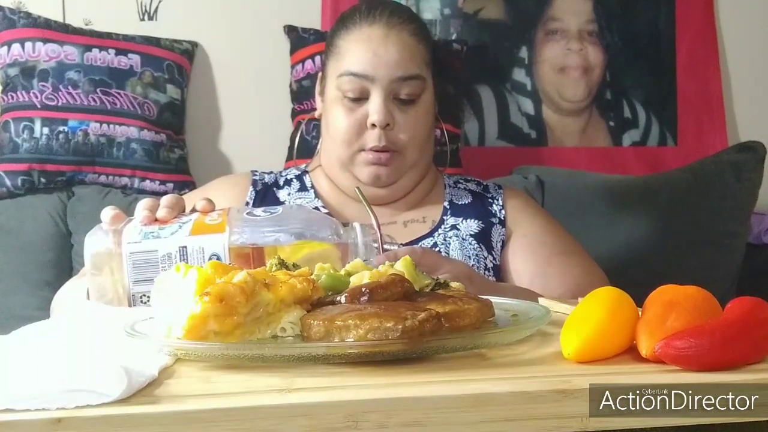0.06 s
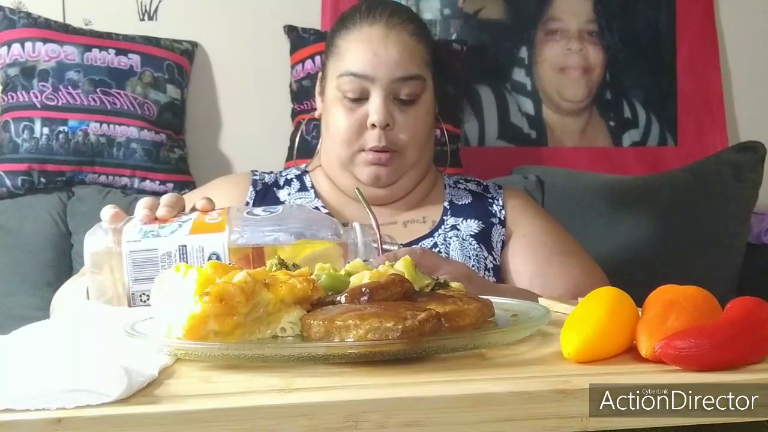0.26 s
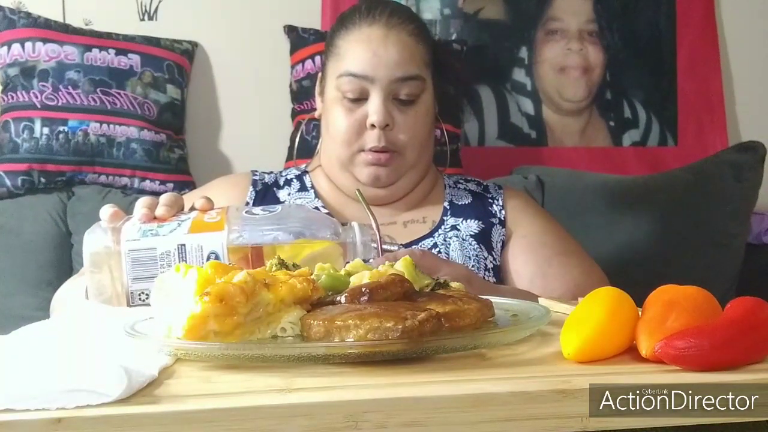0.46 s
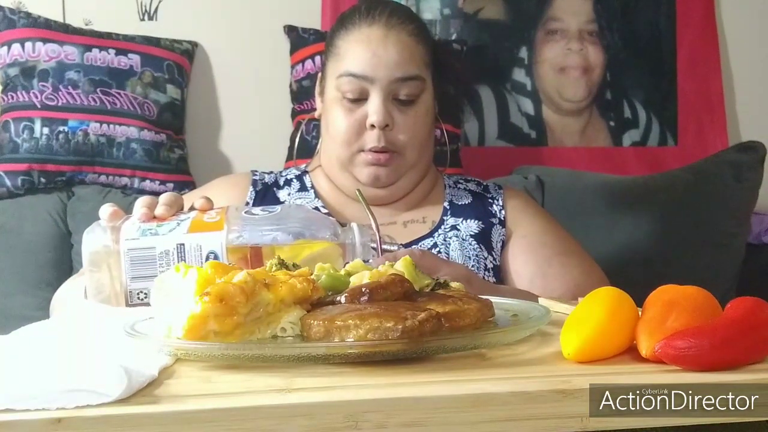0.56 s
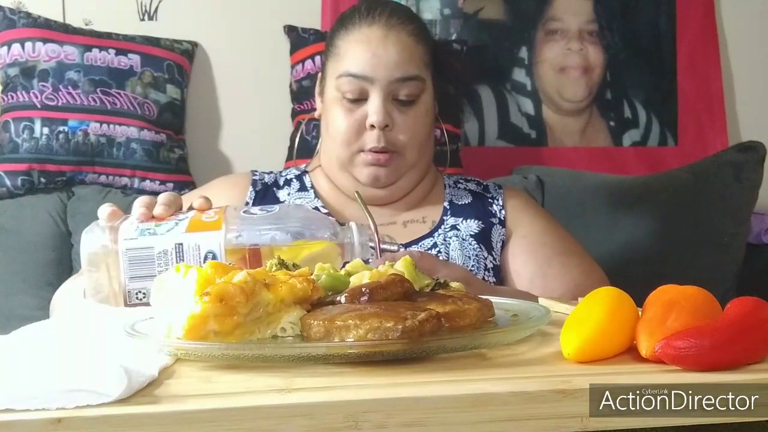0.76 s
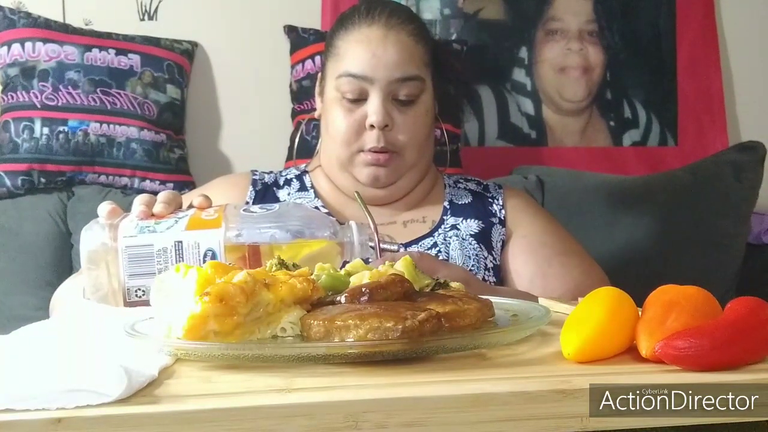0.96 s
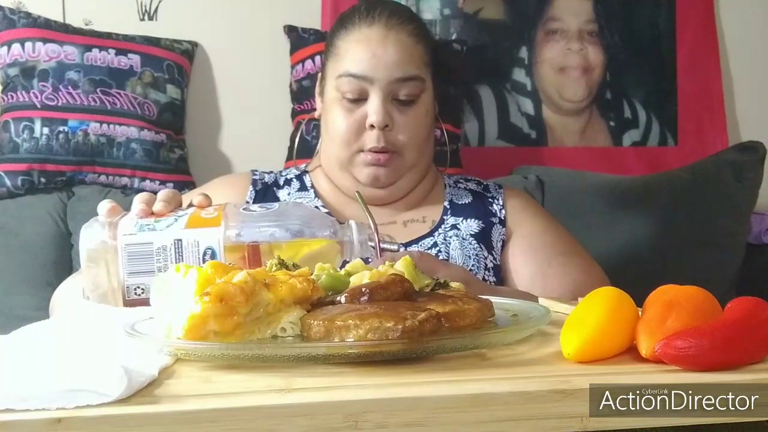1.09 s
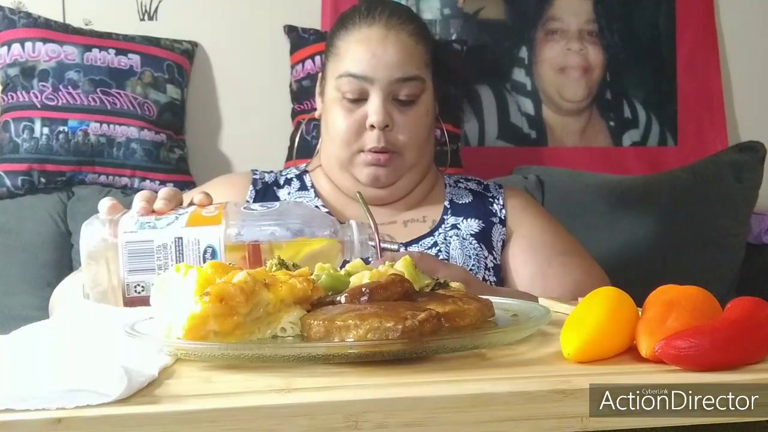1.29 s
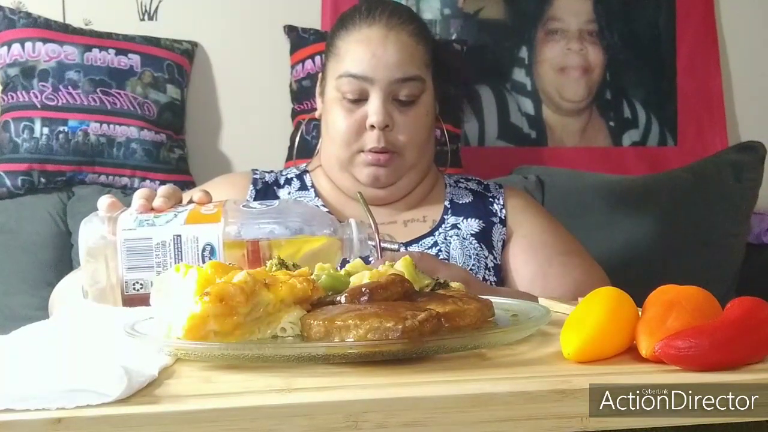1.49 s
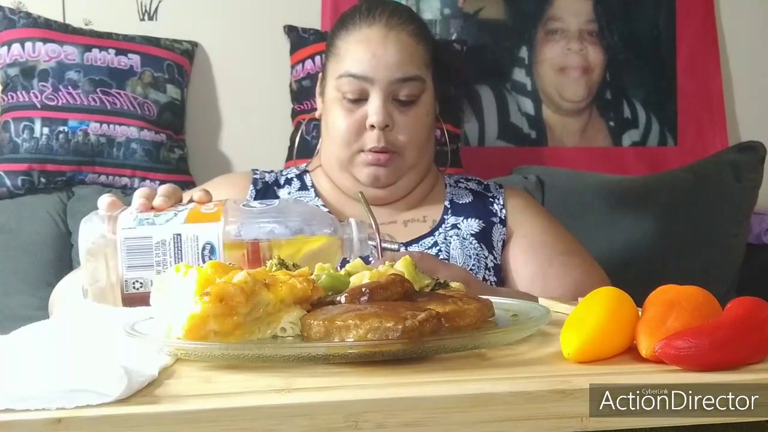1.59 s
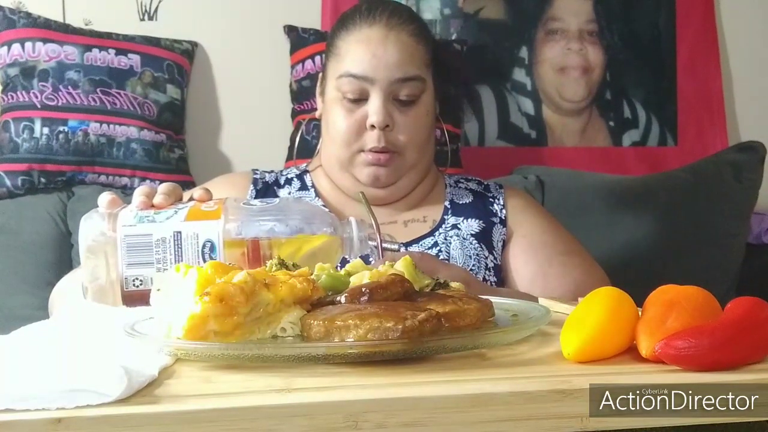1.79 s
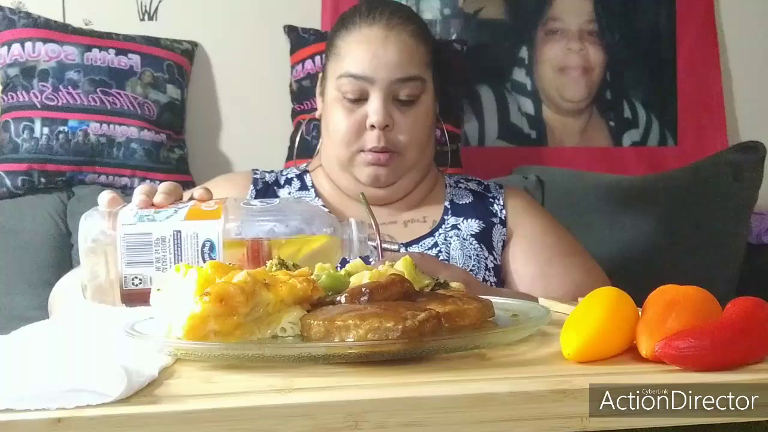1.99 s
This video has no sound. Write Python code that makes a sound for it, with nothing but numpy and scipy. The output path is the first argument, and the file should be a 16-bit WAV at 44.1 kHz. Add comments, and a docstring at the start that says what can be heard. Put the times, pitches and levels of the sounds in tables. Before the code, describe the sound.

A fizzy drink pours from a plastic bottle into a plastic cup, close by in a small, quiet room. Glugs, hollow bottle knocks and splashes come in clusters at about 0.2 and 0.6 seconds, then more strongly around 1.1 and 1.6 seconds with soft low thuds. Foam fizzes lightly throughout with tiny bubble pops and chirps. From 1.7 to 2 seconds, only fizz, pops and light splashing remain.

```python
"""In a small furnished room, a fizzy drink is poured close by from a thin plastic bottle into a plastic cup.
Gulps of air excite the bottle's damped modes, so it knocks, glugs and thuds in irregular clusters.
In the cup the stream splashes and sloshes, small bubbles resonate with a rising chirp or burst,
and the foam fizzes throughout."""
import sys
import numpy as np
from scipy import signal
from scipy.fft import rfft, irfft
from scipy.io import wavfile
from scipy.ndimage import uniform_filter1d

SR = 44100
rng = np.random.default_rng(int(sys.argv[2]) if len(sys.argv) > 2 else 0)


def master_out(mix):
    """Clip the mix to full scale and print it as 16-bit PCM to the path in sys.argv[1]."""
    frames = np.transpose(np.atleast_2d(mix))
    ceiling = np.clip(frames, -1, 1)
    pcm = np.round(ceiling * 32767).astype(np.int16)
    wavfile.write(sys.argv[1], SR, pcm)


N = 90404

# Levels in the tables are relative: each source adds its own gain.
# spectra of the room's background and its reverberation (frequency [Hz], level [dB])
ROOM_TONE_SPECTRUM = [(25, -9), (80, 2), (170, -1), (420, -4.5), (600, -17.5), (4000, -27.5), (15000, -59)]
REVERB_SPECTRUM = [(200, 16.5), (2500, -0.5), (6000, 10), (15000, 0.5)]
# tone of the fizz, ticks and splash, with an equaliser-like treble lift above 5 kHz
# (frequency [Hz], level [dB])
FIZZ_TONE = [(2000, -79), (4700, -7), (5300, 2.5), (6500, 1), (8000, -4), (10500, -5), (13000, -15),
             (15500, -14)]
TICK_TONE = [(1000, -16.5), (4500, -12), (5400, 4.5), (7000, 2), (10000, -4.5), (15500, -13.5)]
SPLASH_TONE = [(900, -10.5), (2000, 2), (3500, -3.5), (4800, -7), (7000, 12)]
# tone of the slosh (frequency [Hz], level [dB])
SLOSH_TONE = [(120, -15.5), (380, -4.5), (900, 0), (2000, -13.5)]
# envelopes of the fizz, whose top treble briefly cuts out
# (time [s], level below 8 kHz [dB], level above 8 kHz [dB])
FIZZ_LEVELS = [(0, -55, -63.5), (.16, -62, -57.5), (.26, -58.5, -52.5), (.4, -54.5, -55), (.62, -59.5, -58),
               (.87, -53, -54), (1.15, -61, -52.5), (1.22, -66, -67), (1.4, -57.5, -58), (1.6, -60.5, -59),
               (1.73, -63.5, -90), (1.781, -52.5, -51.5), (2.05, -62, -63)]
# surges of the stream (time [s], splash level [dB], slosh level [dB])
STREAM_LEVELS = [(0.089, -80, -73), (0.102, -55, -60.5), (0.148, -55.5, -60), (0.166, -71, -78),
                 (0.238, -48, -41.5), (.3, -56.5, -60), (.39, -50.5, -59), (0.483, -59.5, -57),
                 (.53, -73, -71.5), (.58, -72.5, -70.5), (0.653, -53.5, -55), (.7, -70, -71),
                 (0.831, -77.5, -69), (0.881, -57.5, -67.5), (0.95, -76, -69), (0.984, -60, -57),
                 (1.071, -48.5, -47.5), (1.161, -52.5, -49), (1.21, -78.5, -71.5), (1.27, -79, -68),
                 (1.351, -58.5, -53.5), (1.376, -68, -71), (1.533, -70, -67), (1.579, -53.5, -51),
                 (1.698, -70.5, -68), (1.8, -58, -73.5), (1.93, -65.5, -65.5)]
# bubbles bursting at the surface (time [s], level [dB])
POPS = [(0.2583, -33.5), (0.308, -29.5), (0.3711, -35), (0.5473, -31), (0.628, -32), (0.9566, -26.5),
        (1.026, -28.5), (1.049, -31), (1.0769, -22), (1.5575, -32.5), (1.7498, -34), (1.7896, -28),
        (1.7985, -51), (1.821, -34.5), (1.9093, -38), (1.919, -29.5), (1.962, -31.5), (2.022, -30)]
# single bubbles ringing in the cup (time [s], frequency [Hz], level [dB])
PINGS = [(0.017, 9200, -32), (0.049, 6960, -35.5), (0.079, 5920, -28.5), (0.198, 5590, -24.5),
         (0.2994, 6100, -30.5), (0.3377, 2000, -22.5), (0.338, 5040, -30), (0.8153, 5240, -21),
         (0.98, 2690, -27), (1.0753, 5270, -14.5), (1.1359, 8400, -26.5), (1.1641, 5640, -30.5),
         (1.181, 5060, -27.5), (1.3416, 5750, -27), (1.347, 2300, -33), (1.7504, 2180, -34),
         (1.787, 5400, -24), (1.961, 5850, -29.5), (2.021, 5910, -29.5)]
# thuds of the heavier gulps (time [s], frequency [Hz], level [dB])
THUDS = [(0.115, 75.4, -48), (0.259, 65, -46), (1.054, 89, -42), (1.076, 137, -46.5), (1.128, 68, -46.5),
         (1.544, 145, -37.5), (1.61, 83, -31.5)]
# air pockets breaking into the bottle (time [s], frequency [Hz], level [dB])
GLUGS = [(.2235, 1066, -28), (.2325, 690, -28.5), (0.257, 425, -38.5), (.605, 785, -26.5), (.614, 335, -31),
         (1.1185, 672, -26.5), (1.547, 540, -28.5), (1.5995, 770, -34.5), (1.629, 860, -29.5)]
# modes of the part-filled bottle (frequency [Hz], level [dB], T60 [s])
BOTTLE_MODES = [(352, -1, 0.015), (504, -4.5, 0.051), (627, -4.5, 0.039), (778.6, -4.5, 0.053),
                (811, 1, 0.018), (1102, 0, 0.024), (1452, -2.5, 0.023), (1664, 0.5, 0.021),
                (2085, 5.5, 0.011), (2242, 4.5, 0.029), (2650, 4, 0.023), (3340, 6.5, 0.0097),
                (4180, 6, 0.016), (5030, 9.5, 0.0078)]
# knocks of the bottle (time [s], hollow level [dB], body level [dB], wall level [dB], edge level [dB])
KNOCKS = [(0.2109, -65, -44, -38, -58), (0.2193, -39, -34.5, -26.5, -39), (0.2223, -29, -43, -48, -67),
          (.2327, -40, -36.5, -40.5, -42), (0.2599, -26.5, -36, -45, -51), (0.3995, -46.5, -34.5, -65, -69),
          (0.4068, -79, -31.5, -37.5, -91), (0.4598, -88, -38, -42, -54), (0.6057, -33, -33, -54, -70),
          (0.613, -35.5, -37.5, -30.5, -50), (0.7128, -72, -32, -53, -59), (1.0475, -31.5, -34, -38, -41.5),
          (1.0705, -25, -34, -33, -60), (1.075, -28, -24, -31, -27.5), (1.0811, -35, -44, -63, -48),
          (1.113, -45, -38, -34, -51), (1.1192, -34, -22, -50, -45.5), (1.294, -41, -30.5, -42.5, -51),
          (1.3027, -47.5, -34.5, -37.5, -54.5), (1.546, -25, -25.5, -35.5, -43),
          (1.55, -25, -44, -31.5, -48), (1.5588, -38, -27, -45, -51), (1.6152, -41, -37.5, -30, -34)]
KNOCK_REGIONS_HZ = (400, 720, 2200, 4000)  # hollow, body, wall, edge


def undb(db):
    """The decibel scale: 20 dB is a factor of ten in amplitude."""
    return 10 ** (np.asarray(db) / 20)


def unit(x):
    """Normalisation to an rms of 1."""
    return x / np.sqrt(np.mean(x ** 2))


def envelope(points):
    """Amplitude envelope interpolated through (time [s], level [dB]) points."""
    return undb(np.interp(np.arange(N) / SR, *np.array(points).T))


def colour(x, points):
    """Zero-phase filtering by a spectrum of (frequency [Hz], level [dB]) points."""
    hz, db = np.array(points).T
    bins_hz = np.maximum(np.fft.rfftfreq(len(x), 1 / SR), 1)
    return irfft(rfft(x) * undb(np.interp(np.log(bins_hz), np.log(hz), db)), len(x))


def add(out, start, sound):
    """Superposition: a sound joins the mix at its start time in seconds."""
    i = int(np.clip(start * SR, 0, N - 1))
    out[i:i + len(sound)] += sound[:N - i]


def bubble(hz, decay_cycles, rise_cycles, glide):
    """Minnaert resonance: a bubble rings as a damped oscillator, gliding up as it nears the surface."""
    cycles = np.arange(int(6 * decay_cycles * SR / hz) + 2) * hz / SR
    tone = np.sin(2 * np.pi * cycles * (1 + glide * cycles / decay_cycles / 2))
    return tone * np.exp(-cycles / decay_cycles) * (1 - np.exp(-cycles / rise_cycles)) ** 2


def swarm(count, low_hz, high_hz, decay_cycles, spread_db):
    """Incoherent summation of bubbles of random time, pitch and strength; rms 1."""
    out = np.zeros(N)
    for when, pitch, faintness, life in rng.random((count, 4)):
        hz = low_hz + (high_hz - low_hz) * pitch
        cycles = decay_cycles * np.exp(2 * life - 1)
        strength = undb(-spread_db * np.log(faintness + .03))
        add(out, when * N / SR, strength * np.sqrt(hz / cycles) * bubble(hz, cycles, cycles / 2, glide=0))
    return unit(out)


def room_tone(level_db=-64.5):
    """Stationary noise, strongest in the bass, forms the room's background."""
    return undb(level_db) * unit(colour(rng.standard_normal(N), ROOM_TONE_SPECTRUM))


def reverberation(x, t60_s=0.075, onset_s=0.0007):
    """Diffuse reflections decay exponentially, and quickly in a furnished room."""
    t = np.arange(SR // 3) / SR
    tail = colour(rng.standard_normal(len(t)), REVERB_SPECTRUM)
    tail *= np.exp(-np.log(1000) * t / t60_s) * np.clip(t / onset_s, 0, 1)
    return undb(-13) * signal.fftconvolve(x, tail / np.linalg.norm(tail))[:N]


def foam(burst_s=.00055, crossover_hz=8100):
    """Shot noise: tiny bubbles ring and burst at random, merging into a fizz over a fine hiss."""
    pings = swarm(count=700, low_hz=5000, high_hz=14000, decay_cycles=6, spread_db=5)
    bursts = np.zeros(N)
    age = np.arange(SR // 150) / SR / burst_s
    for when, faintness in rng.random((260, 2)):
        add(bursts, when * N / SR, age * np.exp(-age) / (faintness + .06) ** .8)
    crackle = unit(bursts * rng.standard_normal(N))
    hiss = undb(-6.5) * rng.standard_normal(N)
    fizz = undb(2) * unit(pings + undb(2) * crackle) + hiss
    fizz = np.std(fizz) * unit(colour(fizz, FIZZ_TONE))
    top_treble = signal.sosfiltfilt(signal.butter(2, crossover_hz, "high", fs=SR, output="sos"), fizz)
    levels = np.array(FIZZ_LEVELS)
    return envelope(levels[:, [0, 1]]) * (fizz - top_treble) + envelope(levels[:, [0, 2]]) * top_treble


def stream(wash_t60_s=.022):
    """Air entrainment: the stream's small bubbles patter and blur into a wash; larger ones slosh."""
    t = np.arange(SR // 20) / SR
    patter = swarm(count=2800, low_hz=1100, high_hz=5000, decay_cycles=2.6, spread_db=3.4)
    blur = rng.standard_normal(len(t)) * np.exp(-np.log(1000) * t / wash_t60_s)
    wash = undb(-2) * unit(signal.fftconvolve(patter, blur)[:N])
    splash = undb(2) * unit(colour(patter + wash, SPLASH_TONE))
    large_bubbles = swarm(count=1800, low_hz=170, high_hz=1400, decay_cycles=2, spread_db=4)
    slosh = unit(colour(large_bubbles, SLOSH_TONE))
    levels = np.array(STREAM_LEVELS)
    return envelope(levels[:, [0, 1]]) * splash + envelope(levels[:, [0, 2]]) * slosh


def bubble_pops(rise_s=.0006, decay_s=.0011):
    """Film rupture: a bursting surface bubble radiates a brief, hence broadband, tick."""
    out, t = np.zeros(N), np.arange(SR // 100) / SR
    shape = np.exp(-t / decay_s) * (1 - np.exp(-t / rise_s))
    for start, db in POPS:
        add(out, start - rise_s, undb(db + 9.5) * rng.standard_normal(len(t)) * shape)
    return colour(out, TICK_TONE)


def bubble_pings(typical_rise_s=.0008, typical_decay_s=.0012, wobble_s=.0008):
    """Free oscillation: the clearest bubbles chirp upwards, roughened by random amplitude modulation."""
    out = np.zeros(N)
    variety = np.exp(.22 * rng.standard_normal((len(PINGS), 2)))
    for (start, hz, db), (life, bend) in zip(PINGS, variety):
        ping = bubble(hz, typical_decay_s * life * hz, typical_rise_s * life * hz, glide=.036 * bend ** 2)
        add(out, start, undb(db + 9) * ping / np.sqrt(life))
    span = int(wobble_s * SR)
    wobble = unit(uniform_filter1d(uniform_filter1d(rng.standard_normal(N), span), span))
    return out * (1 + .38 * wobble)


def thuds(rise_s=0.0042, decay_s=0.008):
    """Heavily damped oscillation: the liquid's weight briefly rocks the bottle."""
    out, t = np.zeros(N), np.arange(SR // 6) / SR
    shape = (1 - np.exp(-t / rise_s)) ** 2 * np.exp(-t / decay_s)
    for start, hz, db in THUDS:
        add(out, start, undb(db + 10.5) * np.sin(2 * np.pi * hz * t) * shape)
    return out


def glugs():
    """Bubble resonance: each air pocket entering the bottle rings at a pitch set by its size."""
    out = np.zeros(N)
    for start, hz, db in GLUGS:
        add(out, start, undb(db + 3.5) * bubble(hz, decay_cycles=2.2, rise_cycles=0.29, glide=0.018))
    return out


def bottle_knocks(scatter=.025, rise_cycles=0.22, crack_s=0.0026, crack_hz=(1150, 5370), low_cut_hz=174):
    """Modal vibration: each gulp flexes the thin wall, which cracks and rings in its damped modes."""
    out, t = np.zeros(N), np.arange(SR // 12) / SR
    mode_hz, mode_db, t60_s = np.array(BOTTLE_MODES).T
    decay = np.exp(-np.log(1000) * t / t60_s[:, None])
    crack_band = signal.butter(2, crack_hz, "band", fs=SR, output="sos")
    for start, *region_db in KNOCKS:
        drive_db = np.interp(np.log(mode_hz), np.log(KNOCK_REGIONS_HZ), region_db)
        gains = undb(mode_db + drive_db) * rng.choice([-1, 1], len(mode_hz))
        detuned_hz = mode_hz * (1 + scatter * rng.standard_normal(len(mode_hz)))
        cycles = detuned_hz[:, None] * t
        swell = 1 - np.exp(-cycles / rise_cycles)  # low modes build up later
        ring = gains @ (np.sin(2 * np.pi * cycles) * decay * swell)
        crack = signal.sosfilt(crack_band, rng.standard_normal(len(t))) * np.exp(-t / crack_s)
        add(out, start, ring + undb(region_db[-1] + 8) * crack)  # the crack follows the edge level
    return signal.sosfilt(signal.butter(2, low_cut_hz, "high", fs=SR, output="sos"), out)


def scene():
    """Superposition of direct sound, reverberation and background in one channel."""
    direct = bottle_knocks() + glugs() + thuds() + bubble_pings() + bubble_pops() + foam() + stream()
    return (direct + reverberation(direct) + room_tone())[None]


def record(dry, cutoff_hz=15700):
    """Band limiting: a steep low-pass filter removes the highest treble."""
    return signal.sosfilt(signal.ellip(8, .2, 70, cutoff_hz, fs=SR, output="sos"), dry)


dry = scene()
out = record(dry)
master_out(out)
```